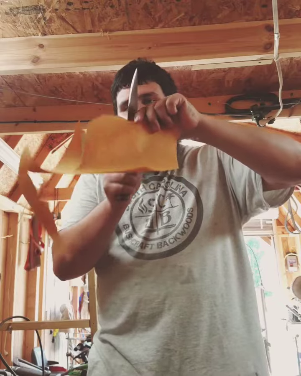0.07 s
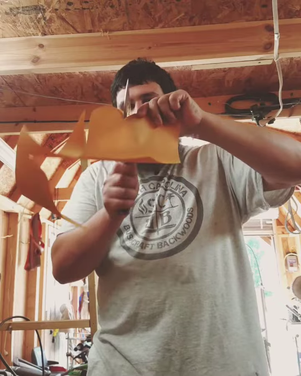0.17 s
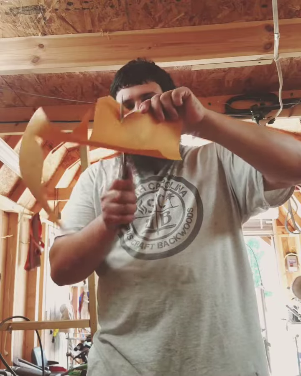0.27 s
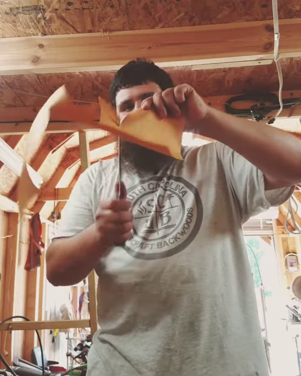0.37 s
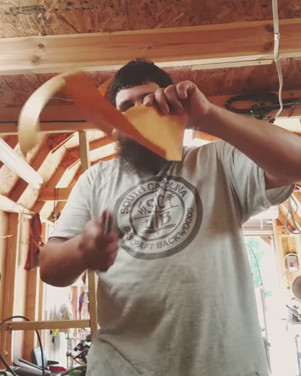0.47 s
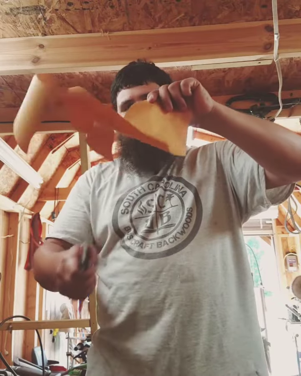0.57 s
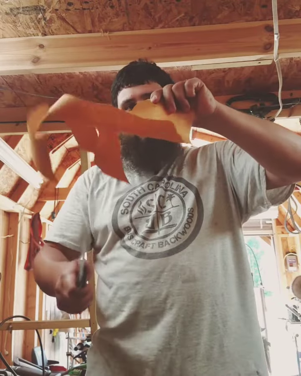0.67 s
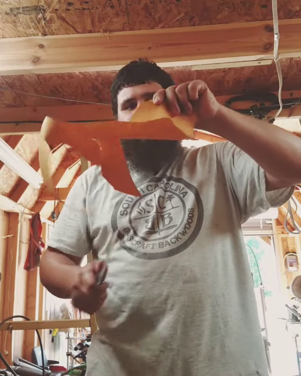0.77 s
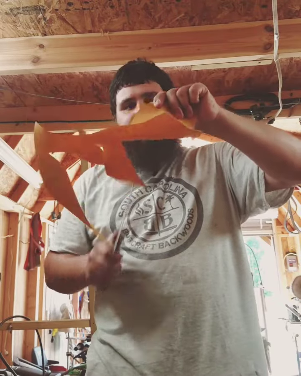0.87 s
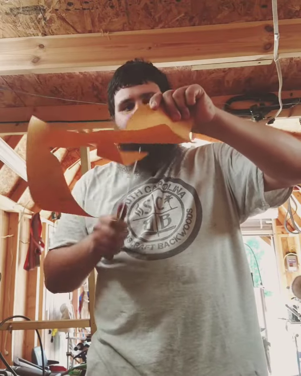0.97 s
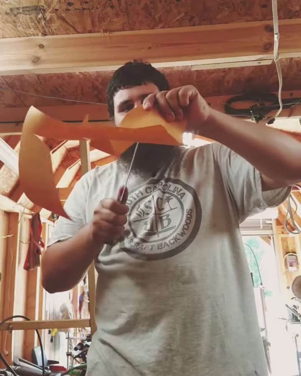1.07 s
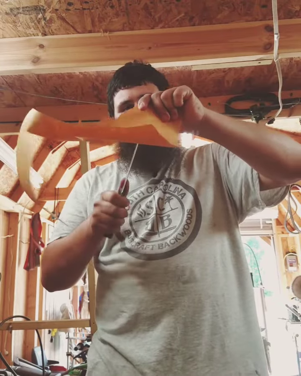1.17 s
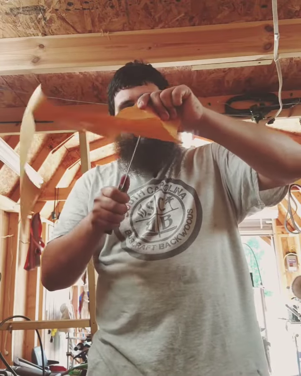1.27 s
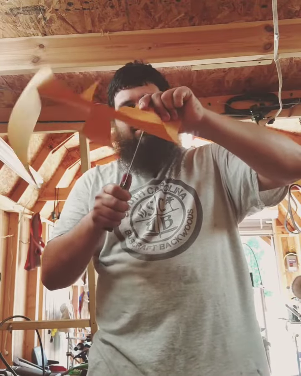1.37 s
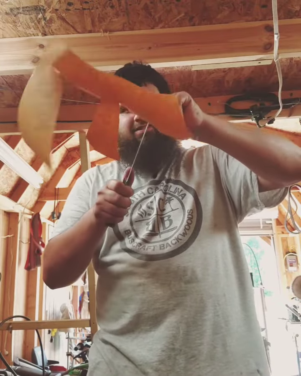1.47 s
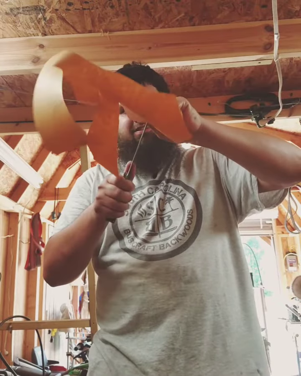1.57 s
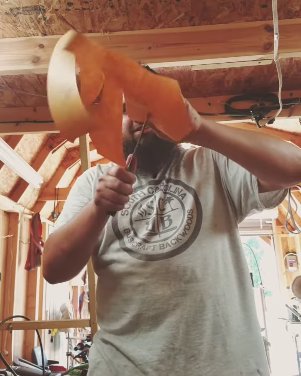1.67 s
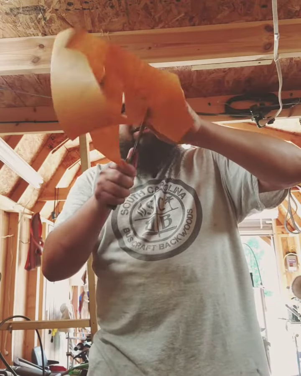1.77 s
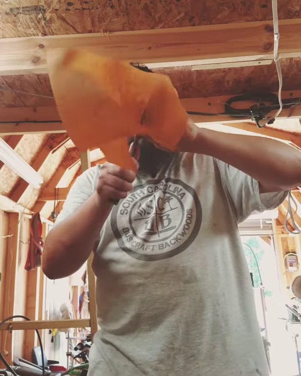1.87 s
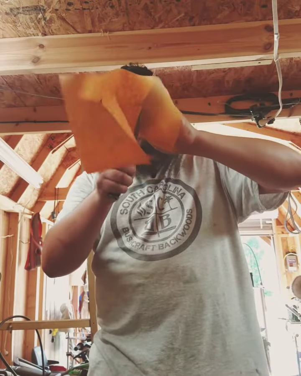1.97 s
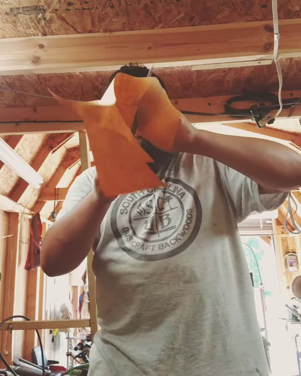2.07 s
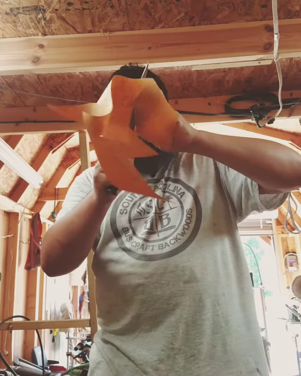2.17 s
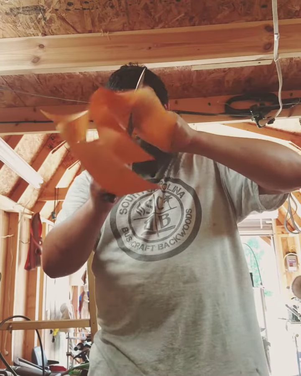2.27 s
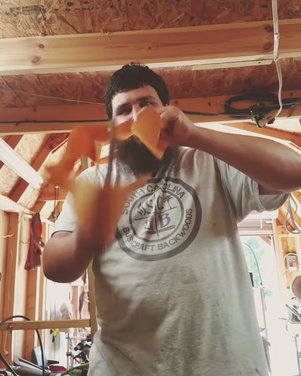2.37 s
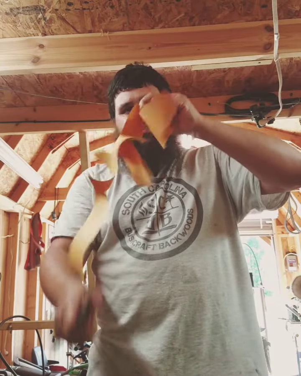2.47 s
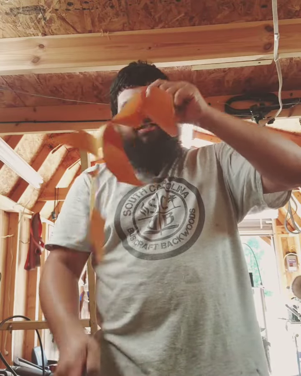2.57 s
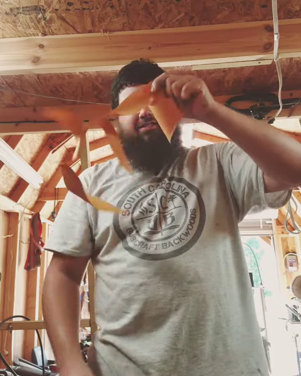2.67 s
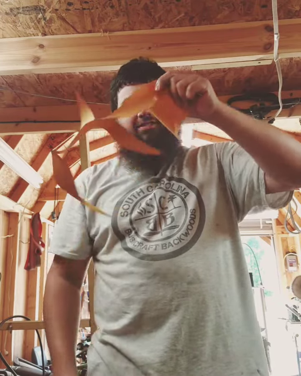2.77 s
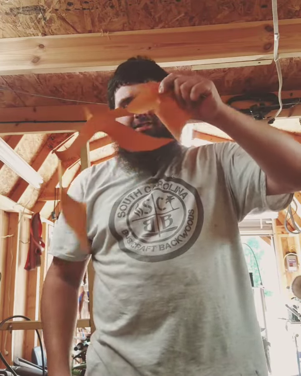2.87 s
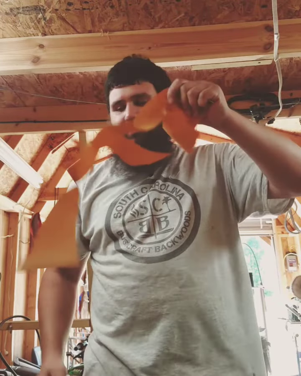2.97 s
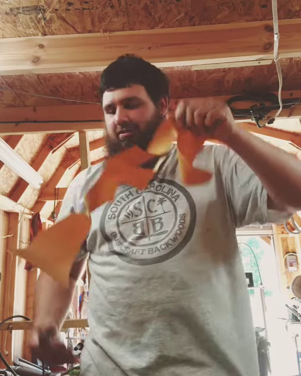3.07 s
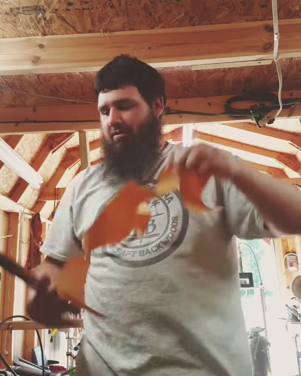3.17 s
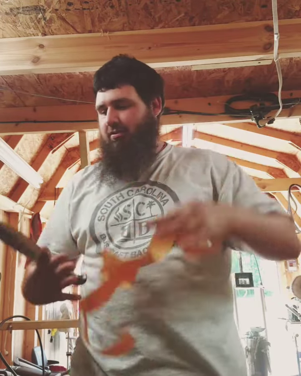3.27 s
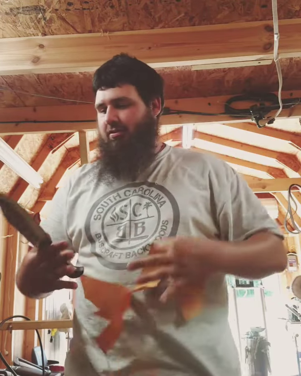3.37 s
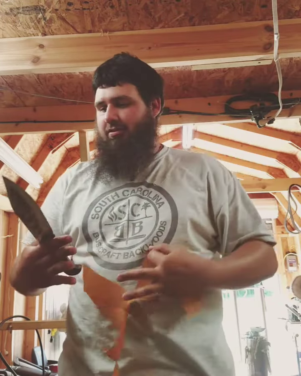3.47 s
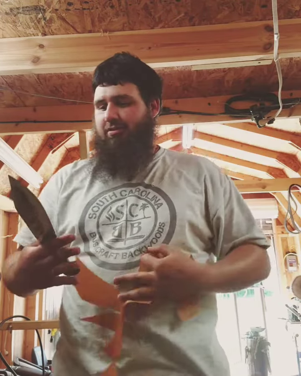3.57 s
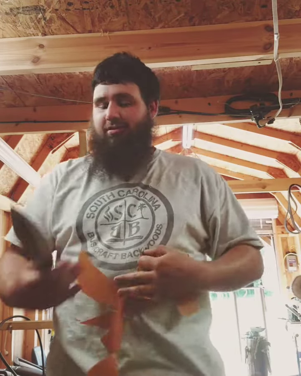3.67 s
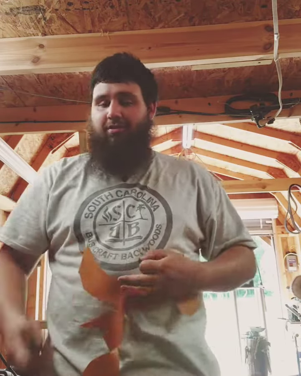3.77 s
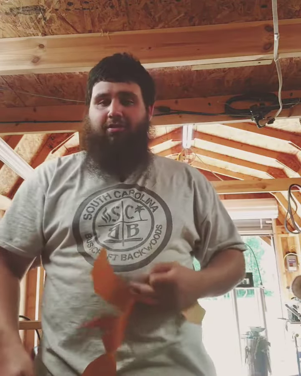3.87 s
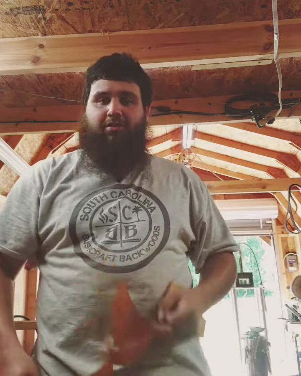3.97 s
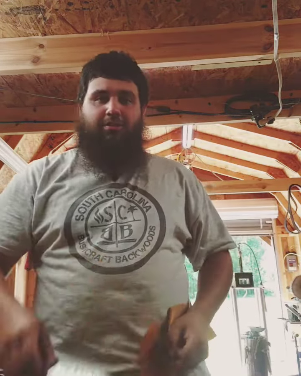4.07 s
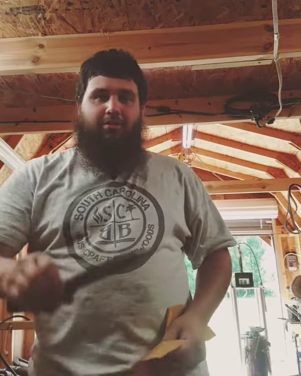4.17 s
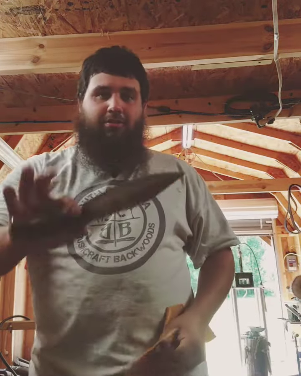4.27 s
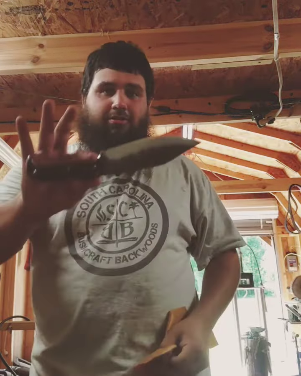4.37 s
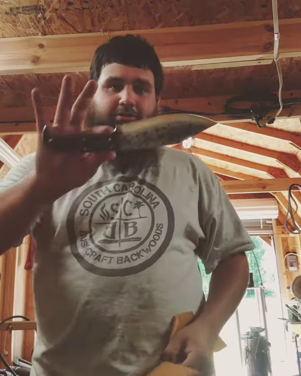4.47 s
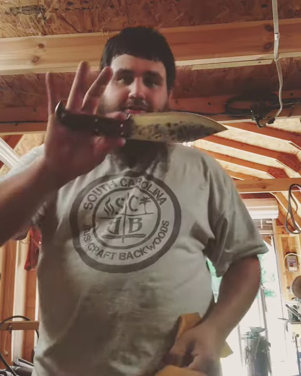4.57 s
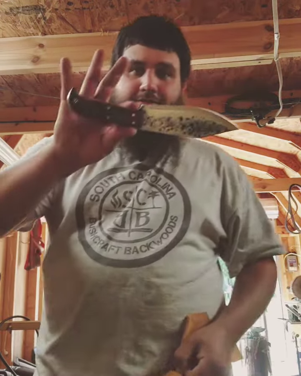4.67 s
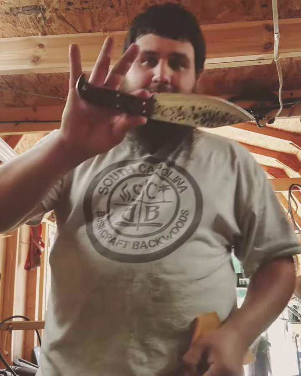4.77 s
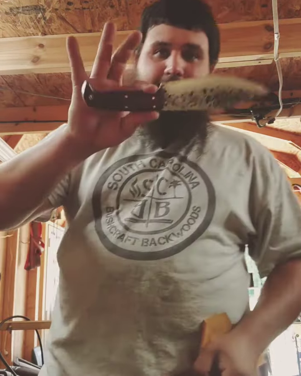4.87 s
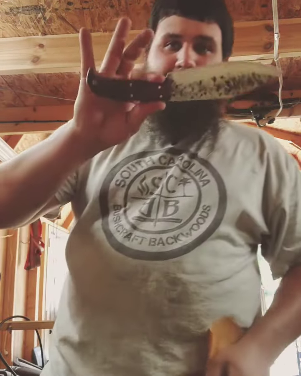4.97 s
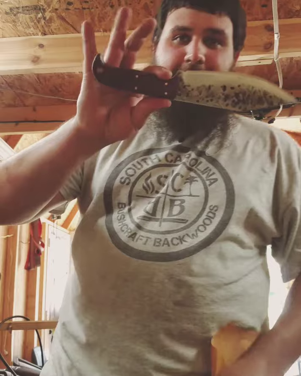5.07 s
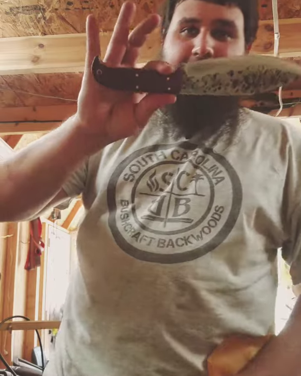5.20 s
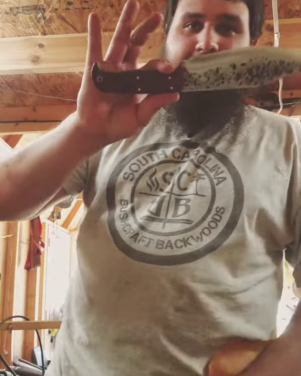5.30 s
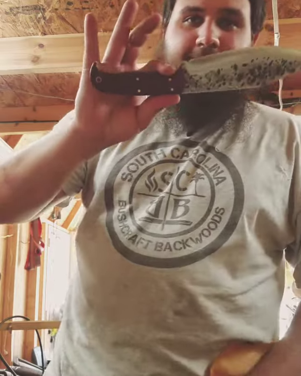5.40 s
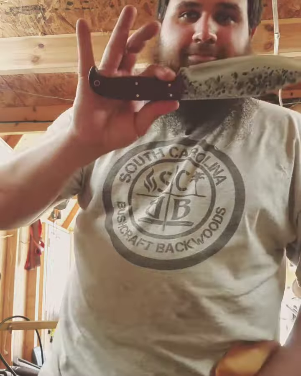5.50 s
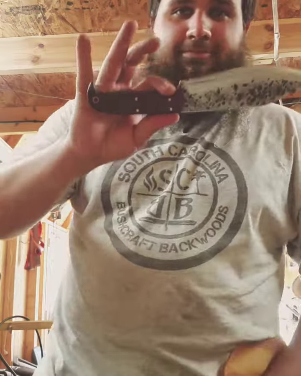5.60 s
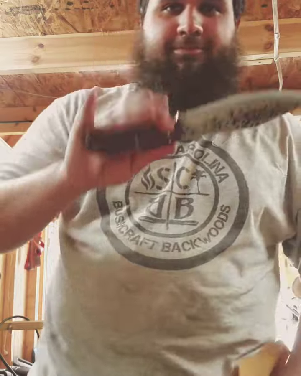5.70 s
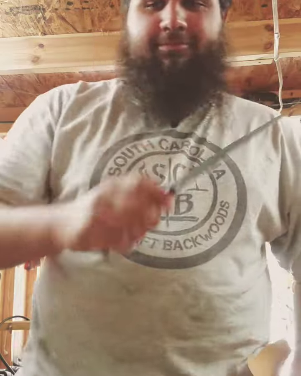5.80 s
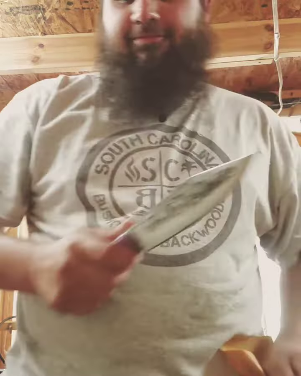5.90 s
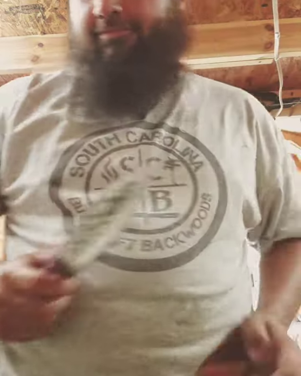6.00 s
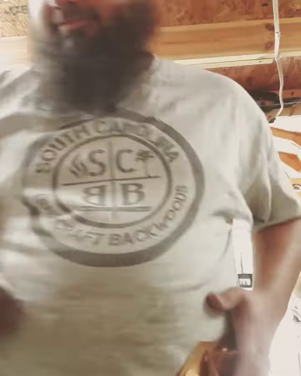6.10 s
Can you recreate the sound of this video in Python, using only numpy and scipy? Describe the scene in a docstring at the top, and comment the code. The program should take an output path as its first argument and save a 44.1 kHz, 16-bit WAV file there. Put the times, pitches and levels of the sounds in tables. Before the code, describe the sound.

Quick papery rips from a keen blade, small crinkly pops and soft rubbing afterwards, with a fan and motors humming low in a wooden room.

```python
"""A sharp knife slices a hand-held sheet of paper in a small wooden workshop, heard at two microphone ports.
The edge snaps fibres by the thousand, as filtered random impulses, and the sheet radiates them.
Loose paper buckles with cracks and brief rings; paper and shirt rustle as sparser snaps in soft hiss.
A few soft steps boom as decaying sines. A fan and other motors hum throughout: wavering sines and coloured noise."""
import sys
import numpy as np
from scipy import signal
from scipy.fft import rfft, irfft
from scipy.io import wavfile

SR = 44100
rng = np.random.default_rng(int(sys.argv[2]) if len(sys.argv) > 2 else 0)


def wrap_up_sound(samples):
    """Save the sound to the file named by the first command line argument, as 16-bit audio."""
    columns = np.atleast_2d(samples).T
    # keep every value between -1 and 1, then stretch to whole-number steps
    tamed = np.clip(columns, -1, 1)
    steps = np.round(tamed * 32767).astype(np.int16)
    wavfile.write(sys.argv[1], SR, steps)


N = 275184
T = np.arange(N) / SR

# sheet resonance colour: (frequency [Hz], relative level [dB])
SHEET_COLOUR = [(300, -35), (700, -19.5), (1100, -9.5), (1450, -13), (1850, 2.5), (2250, 2), (2700, 0.5),
                (3200, -3.5), (4200, -3), (6000, -24.5)]
# fibre sizzle colour: (frequency [Hz], relative level [dB])
SIZZLE_COLOUR = [(4000, -49), (7000, 0.5), (8300, 8), (9600, -3.5), (11500, 0.5), (13000, -4.5),
                 (14500, -13), (18000, -6)]


def undb(db):
    """Decibels to gain."""
    return np.exp(np.asarray(db) * (np.log(10) / 20))


def unit(x):
    """Scale to rms 1."""
    return x / np.sqrt(np.mean(x ** 2))


def colour(x, points):
    """Causal minimum-phase filter through (Hz, dB) points, built from the folded cepstrum."""
    points_hz, points_db = np.transpose(points)
    n = 4096
    bins_hz = np.maximum(np.fft.rfftfreq(n, 1 / SR), 1)
    bins_db = np.interp(np.log(bins_hz), np.log(points_hz), points_db)
    cepstrum = irfft(np.log(undb(bins_db)), n)
    cepstrum[1:n // 2] *= 2
    cepstrum[n // 2 + 1:] = 0
    response = irfft(np.exp(rfft(cepstrum)), n)
    return np.apply_along_axis(signal.oaconvolve, -1, x, response)[..., :x.shape[-1]]


def walk(rate_hz):
    """Smooth chance with a spread near 1, heading for a new value rate_hz times a second."""
    values = rng.standard_normal(8192)
    return 1.2 * np.interp(T * rate_hz, np.arange(len(values)), values)


def add(track, start_s, sound):
    """Mix a short sound into a track."""
    start = int(start_s * SR)
    track[start:start + len(sound)] += sound[:N - start]


def lean(pair, balance):
    """Tilt left against right, band by band, half the difference on each port."""
    return np.array([colour(x, np.array(balance) * [1, half]) for x, half in zip(pair, (.5, -.5))])


def hum(waver_db=0.1963, waver_rad=0.11):
    """Steady motor tones, the higher ones wavering more in the moving air; one more swells and fades slowly."""
    # motor and mains tones, with left's lead in the room's standing wave:
    # (frequency [Hz], left level [dB], right level [dB], left lead [rad])
    tones = [(57.8, -26, -22, 3.1), (78.6, -58, -54, 2.7), (96.6, -47, -51, 2.1), (115.6, -49, -51, .4),
             (119.9, -51, -51, 2.1), (173.4, -51.5, -47.5, 0), (231.1, -55, -55, -1.5),
             (245.3, -39, -35, 3.1), (265.8, -49, -50, 0), (317.2, -53, -50, 3.1), (346.7, -54, -48, .6),
             (359.8, -54, -55, 0), (462.3, -54, -53, 0), (520.1, -55, -53, 0), (642, -54, -50, .7),
             (659.8, -55, -59, .5), (875.4, -54, -52, .1), (1098, -59, -57, 3.1)]
    # slowly swelling motor tone: (frequency [Hz], middle [s], half length [s], level [dB])
    swelling_tone = (467, 3.5, 2.3, -51)
    out = np.zeros((2, N))
    for hz, left_db, right_db, lead_rad in tones:
        unrest = hz / tones[0][0]
        phase = 2 * np.pi * (hz * T + rng.random()) + waver_rad * unrest * walk(rate_hz=5.5)
        size = np.sqrt(2) * undb(waver_db * unrest * walk(rate_hz=6))
        left = undb(left_db) * np.sin(phase + lead_rad)
        right = undb(right_db) * np.sin(phase)
        out += size * np.array([left, right])
    hz, middle_s, half_s, db = swelling_tone
    swell = np.exp(-((T - middle_s) / half_s) ** 2)
    return out + np.sqrt(2) * undb(db) * swell * np.sin(2 * np.pi * hz * T + walk(rate_hz=9))


def air(mid_db=-36.5, side_db=-39, flutter_db=1.0):
    """The fan's soft rush: fluttering noise, one part common to both ports and one opposed between them."""
    # common part's colour: (frequency [Hz], relative density [dB per Hz])
    mid_colour = [(25, -7), (70, -4.5), (150, -4), (200, -2), (270, 3.5), (400, 1.5), (720, 1.5),
                  (1000, -6), (1400, -10), (2300, -9), (3500, -16), (5800, -14), (7500, -22.5),
                  (11000, -45.5)]
    # opposed part's colour: (frequency [Hz], relative density [dB per Hz])
    side_colour = [(25, -21), (60, -4), (150, 5), (270, -6), (450, -3), (800, -4), (1200, -1.5),
                   (2300, -7.5), (3500, -13), (5200, -9.5), (7500, -19), (11000, -17.5), (14500, -28)]
    mid = unit(colour(rng.standard_normal(N), mid_colour)) * undb(flutter_db * walk(rate_hz=7.4))
    side = unit(colour(rng.standard_normal(N), side_colour)) * undb(flutter_db * walk(rate_hz=7.4))
    return undb(mid_db) * mid + undb(side_db) * side * np.array([[1], [-1]])


def snaps(per_s, spread_db):
    """Fibres letting go at random moments: many small, a few large."""
    happens = rng.random(N) < per_s / SR
    size = undb(spread_db * np.clip(rng.standard_normal(N), -2.5, 2.5))
    return unit(happens * size * rng.choice([-1, 1], N))


def voice(fibres, friction_db, spectrum):
    """Fibre snaps, each pushing or pulling the sheet, and smooth friction, radiated with one colour."""
    pushes = unit(fibres) * rng.choice([-1, 1], N)
    friction = undb(friction_db) * rng.standard_normal(N)
    return unit(colour(pushes + friction, spectrum))


def force(start_s, rise_s, hold_s, release_s, contact_s=0.0096):
    """One push: the edge bites, the force builds, holds and dies faster and faster as it leaves the sheet."""
    bite_db, release_db = -9.5, -20.5  # re full force, at the first bite and after release_s
    t = T - start_s
    build = bite_db * np.clip(1 - t / rise_s, 0, 1)
    fall = release_db * np.clip((t - rise_s - hold_s) / release_s, 0, 10) ** 1.08
    return np.clip(t / contact_s + .5, 0, 1) * undb(build + fall)


def ring(x, hz, width_hz):
    """A resonance whose centre moves: shift down to zero, low-pass, shift back."""
    turn = np.exp(2j * np.pi * np.cumsum(hz) / SR)
    lowpass = signal.butter(2, width_hz / 2, fs=SR, output="sos")
    return unit((turn * signal.sosfilt(lowpass, x / turn)).real)


def flex(x, depth_db, rate_hz, count=11):
    """The paper bends as it moves, so its resonances flare and fade each on their own."""
    centres = np.log(np.geomspace(1200, 12000, count))
    pitch = np.log(np.maximum(np.fft.rfftfreq(N, 1 / SR), 1))
    spectrum = rfft(x)
    bands = (irfft(spectrum * np.interp(pitch, centres, share), N) for share in np.eye(count))
    return sum(band * unit(undb(depth_db * walk(rate_hz))) for band in bands)


def slicing(strip_width_hz=950, strip_wander=0.043, scrape_db=1, sheet_db=2.5, sizzle_db=6.0, catch_db=1.5):
    """The edge catches and slips, so the fibre snaps come in bunches; the strip's ring glides as it is freed."""
    # blade pushes: (start [s], rise [s], hold [s], release [s], relative scrape level [dB],
    # then re scrape: sheet resonance [dB], sizzle [dB], low body [dB], strip ring [dB],
    # ring frequency at start [Hz], ring frequency at end [Hz])
    pushes = [(0.151, 0.004, 0.47, 0.056, -34, 1, -3, -9.5, 3, 3070, 3660),
              (0.208, 0.048, 0.02, 0.27, -22.5, -0.5, -22, -15, -5.5, 5970, 4640),
              (0.282, 0.014, 0.051, 0.036, -36, 3, -16, -12, 11.5, 2130, 2960),
              (0.425, 0.014, 0.031, 0.028, -39.5, -6, -12, -14, 10.5, 2230, 2940),
              (0.514, 0.038, 0.057, 0.016, -24, -10, -3, -10.5, -8, 4230, 5140),
              (1.598, 0.012, 0.11, 0.12, -22, -6.5, -6, -10.5, -1.5, 5100, 4840),
              (1.833, 0.12, 0.024, 0.21, -24, -6.5, -6, -9.5, -9, 4940, 5670),
              (1.92, 0.062, 0.14, 0.075, -37.5, -0.5, -3, -8, 6, 2330, 2000),
              (2.408, 0.12, 0.015, 0.08, -27.5, -4, -6.5, -4.5, -7, 5900, 5450),
              (2.491, 0.031, 0.0071, 0.033, -20.5, -14, -2.5, -22, -4, 5500, 5700),
              (2.609, 0.0079, 0.036, 0.038, -23.5, -18, -2, -23, -3.5, 3450, 6000)]
    # blade scrape colour: (frequency [Hz], relative level [dB])
    scrape_colour = [(400, -43), (1500, -17), (2600, -17), (3300, -8), (4100, -3.5), (4800, -3.5),
                     (5800, 0.5), (6600, -4), (7600, -12), (9500, -11), (15000, -46)]
    # sheet's low body colour: (frequency [Hz], relative level [dB])
    body_colour = [(150, -17.5), (350, -4), (600, 2.5), (1000, -2), (1500, -1.5), (2500, 0), (6000, -59)]
    fibres = snaps(per_s=7000, spread_db=3.5) * undb(catch_db * walk(rate_hz=280))
    wander = 1 + strip_wander * walk(rate_hz=45)
    power, strip = np.zeros((4, N)), np.zeros(N)
    for start_s, rise_s, hold_s, release_s, db, *shares_db, strip_db, first_hz, last_hz in pushes:
        push = force(start_s, rise_s, hold_s, release_s)
        gains = undb(db + np.array([0, *shares_db]))[:, None]
        # sheet and sizzle follow slightly different powers of the force
        power += (gains * [push, push ** 0.99, push ** 1.06, push]) ** 2
        end_s = start_s + rise_s + hold_s + release_s / 2
        glide_hz = np.interp(T, [start_s, end_s], [first_hz, last_hz])
        strip += undb(db + strip_db) * push * ring(fibres, glide_hz * wander, strip_width_hz)
    scrape = undb(scrape_db) * voice(fibres, -8, scrape_colour)
    sheet = undb(sheet_db) * voice(fibres, -8, SHEET_COLOUR)
    sizzle = undb(sizzle_db) * voice(fibres, -8, SIZZLE_COLOUR)
    body = voice(fibres, -8, body_colour)
    cuts = np.sum(np.sqrt(power) * [scrape, sheet, sizzle, body], axis=0)
    return flex(cuts + strip, depth_db=3, rate_hz=80)


def buckles(ring_cycles=5, crack_s=.0005, settle_s=.014, settle_db=-21, ring_width=.19):
    """A fold pops through: a sharp crack, a brief ring of the patch, and small snaps as it settles."""
    # folds: (time [s], relative peak [dB], ring frequency [Hz], crack level re ring [dB])
    folds = [(0.2614, -7, 1930, 10), (1.0554, -13, 5600, -2), (1.1035, -13.5, 4900, -12),
             (1.108, -11, 5800, 3.5), (1.3974, -8, 4230, -8), (1.4, -21, 5470, -1), (1.411, -8, 5500, 6),
             (1.4934, -24, 4700, -5), (1.4973, -8.5, 4660, 4), (1.503, -7, 6040, 20),
             (1.5652, -13, 4860, -1), (1.5834, -8, 4800, -15), (1.603, -6, 5300, 3), (2.0773, -7, 2070, -3),
             (2.095, -7, 2230, 0), (2.195, -20, 4950, -5), (2.4074, -8.5, 1840, -3),
             (2.586, -3.5, 2810, -6), (2.5978, -10, 2370, 2), (2.6188, -4.5, 3770, -19),
             (3.1406, -21.5, 11500, 4), (3.6653, -19.5, 5830, -7.5), (3.934, -6, 6300, 6.5),
             (4.1541, -28.5, 5790, 1), (4.4677, -17.5, 5200, -10), (5.437, -16.5, 5600, -5),
             (5.521, -8.5, 5700, -12), (5.5578, -8, 5600, 3), (5.597, -7, 5500, 0), (5.6214, -4, 5560, -7),
             (5.6225, -14, 5500, -8), (5.643, -2.5, 5370, -2), (5.7077, -6, 5400, -14),
             (5.7618, -12, 5260, -10.5), (5.8315, -11, 5800, -4), (5.844, -6, 4600, -9),
             (6.048, -17, 5900, -7), (6.1368, -12, 5770, -4)]
    # crack colour: (frequency [Hz], relative level [dB])
    crack_colour = [(300, -1), (1200, -17), (2300, -8), (3400, -5), (5500, -1.5), (7500, 1), (10500, -6.5),
                    (15000, -14)]
    out, t = np.zeros(N), T[:2048]
    for fold_s, db, hz, crack_db in folds:
        noise = rng.standard_normal((2, len(t)))
        partials_hz = hz * np.exp(ring_width * np.array([-1, 0, 1]))
        tones = np.array([.5, 1, .7]) @ np.sin(2 * np.pi * partials_hz[:, None] * t)
        patch = tones * np.exp(-t * hz / ring_cycles)
        burst = np.sign(noise[0]) * np.exp(-t / crack_s)
        settling = undb(settle_db) * noise[1] * np.exp(-t / settle_s)
        crack = colour(burst + settling, crack_colour)
        pop = unit(patch) + undb(crack_db) * unit(crack)
        add(out, fold_s + 0.00073, undb(db) * pop / abs(pop).max())
    return out


def handling(sizzle_db=6.0, rub_db=1.0, sheet_db=-6.0, flutter_db=-0.7, snap_spread_db=2.5):
    """Light rubbing: sparser snaps in a soft hiss that swells and dies with each slide."""
    # slides of paper and cloth: (middle [s], half length [s], relative sizzle level [dB],
    # rub level re sizzle [dB], sheet resonance level re sizzle [dB])
    slides = [(1.232, 0.035, -45.5, 1, 5), (1.51, 0.012, -36, -2, 8), (1.585, 0.032, -35, 5, 6),
              (2.136, 0.0083, -46, 11, 5), (2.207, 0.015, -43.5, 7, 11.5), (2.304, 0.015, -51, 5, 19),
              (2.328, 0.031, -45, 5, 10.5), (2.41, 0.012, -43.5, 10.5, 10), (2.452, 0.018, -46, 7, 16),
              (3.238, 0.088, -52, 4, 11), (3.415, 0.019, -53.5, -2.5, 0), (3.704, 0.081, -51.5, 3.5, 10.5),
              (4.004, 0.11, -44, 1, 3), (4.25, 0.079, -47.5, 5.5, 4.5), (5.14, 0.072, -47.5, 4, 2),
              (5.452, 0.14, -44.5, 6.5, 1), (5.537, 0.027, -35.5, 8, -1), (5.607, 0.015, -29.5, 1.5, -1),
              (5.66, 0.024, -36, 9, 8), (5.711, 0.013, -40, 12.5, -2), (5.784, 0.049, -46.5, 10.5, -1),
              (5.863, 0.058, -43, 9.5, 0), (5.962, 0.12, -41, 7.5, 8.5), (6.08, 0.04, -43, 11, 16),
              (6.144, 0.054, -43.5, 6.5, 6), (6.232, 0.015, -34, 10, 11.5)]
    # light rubbing colour: (frequency [Hz], relative level [dB])
    rub_colour = [(200, -24), (700, -13.5), (1300, -7), (2600, -6), (3700, -8.5), (4500, 3), (5100, -1),
                  (5800, 2), (6500, -3), (7600, -13), (9500, -19), (15000, -28)]
    flutter = undb(2.2 * walk(rate_hz=110) + flutter_db * walk(rate_hz=40))
    fibres = snaps(per_s=900, spread_db=snap_spread_db) * flutter
    sizzle = undb(sizzle_db) * voice(fibres, 1, SIZZLE_COLOUR)
    rub = undb(rub_db) * voice(fibres, -5, rub_colour)
    sheet = undb(sheet_db) * voice(fibres, 3, SHEET_COLOUR)
    power = np.zeros((3, N))
    for middle_s, half_s, db, rub_share_db, sheet_share_db in slides:
        swell = np.exp(-np.minimum(abs((T - middle_s) / half_s), 10) ** 1.66)  # exponent 2 = bell curve
        power += np.outer(undb(db + np.array([0, rub_share_db, sheet_share_db])) ** 2, swell)
    rustle = np.sum(np.sqrt(power) * [sizzle, rub, sheet], axis=0)
    return flex(rustle, depth_db=3.5, rate_hz=55)


def steps(swell_s=0.024):
    """A soft footfall makes the floor boom briefly at two close frequencies."""
    # footfalls: (time [s], relative level [dB], boom frequency [Hz])
    footfalls = [(4.729, -35, 130), (5.484, -32, 145), (5.955, -34, 135), (6.0, -37, 173.4)]
    out, t = np.zeros(N), T[:SR // 3]
    swell = (t / swell_s) ** 2 * np.exp(2 - 2 * t / swell_s)
    for step_s, db, hz in footfalls:
        boom = np.sin(2 * np.pi * hz * t) + 0.5 * np.sin(2 * np.pi * hz * 0.83 * t)
        add(out, step_s, undb(db) * boom * swell)
    return out


def ports(x, delay_samples):
    """Direct sound reaches the left port delay_samples after the right one."""
    return np.array([np.pad(x, (delay_samples, 0))[:N], x])


def reflections(x, t60_s=0.24, tail_db=-8, early_db=-1.5, early_s=0.0045):
    """What one port hears back: chest and rafters first, then a short wooden tail."""
    t = T[:SR // 2]
    hits = (rng.random(len(t)) < .15) * rng.standard_normal(len(t))
    early = hits * np.exp(-t / early_s) * (t > .001)
    tail = rng.standard_normal(len(t)) * undb(-60 * t / t60_s) * np.minimum(t / .008, 1)
    early = undb(early_db) * early / np.linalg.norm(early)
    tail = undb(tail_db) * tail / np.linalg.norm(tail)
    return signal.oaconvolve(x, early + tail)[:N]


def workshop(x, count=3):
    """The sheet flaps about, so its sound passes between a few sets of reflections."""
    shares = np.array([undb(9 * walk(rate_hz=12)) for _ in range(count)])
    shares /= np.linalg.norm(shares, axis=0)
    return sum(np.array([reflections(x * share), reflections(x * share)]) for share in shares)


def scene(room_db=3.5):
    """Paper in the room, steps and machines; the leaned sounds are fuller at right in the bass."""
    # port balance for sound from the front: (frequency [Hz], left minus right [dB])
    front_balance = [(150, -12.5), (600, -1), (1500, 2.5), (3200, -1.9), (5000, -2), (8000, 2.5),
                     (11000, -2.5), (14000, -11)]
    # left-right balance of the soft rush: (frequency [Hz], left minus right [dB])
    rush_balance = [(150, -3), (600, -1), (1500, 0.7), (5000, -2), (8000, 6.5), (11000, -6.5), (14000, -13)]
    # colour of the wooden walls' and rafters' reflections: (frequency [Hz], relative level [dB])
    wood_colour = [(500, -1.5), (1300, -2), (2200, -3), (3200, -1), (4500, -1.5), (8000, 1), (13000, -0.5)]
    # two patches of the sheet, each with its own snaps, lead at opposite ports; both rustle layers reach the
    # right port first
    patch_a, patch_b = undb(-4) * slicing(), undb(-6.5) * slicing()
    rustle_a, rustle_b = undb(-4.5) * handling(), undb(-6) * handling()
    pops = buckles()
    direct = ports(patch_a, 18) + ports(patch_b, 22)[::-1]
    direct += ports(rustle_a, 8) + ports(rustle_b, 17) + ports(pops, 16)
    room = workshop(patch_a + patch_b + rustle_a + rustle_b + undb(-7) * pops, count=5)
    front = direct + undb(room_db) * colour(room, wood_colour) + steps()
    return lean(front, front_balance) + lean(air(), rush_balance) + hum()


def record(dry):
    """The ports notch the treble, the loudest peaks are rounded and the top is cut."""
    # narrow band cancelled by the microphone ports: (frequency [Hz], level [dB])
    port_notch = [(6300, 0.5), (7100, -6), (7700, -17.5), (8300, -22.5), (8900, -11), (9600, -1.5)]
    top_hz = 14450
    rounded = .8 * np.tanh(colour(dry, port_notch) / .8)
    return signal.sosfilt(signal.ellip(10, .2, 80, top_hz, fs=SR, output="sos"), rounded)


dry = scene()
out = record(dry)
wrap_up_sound(out)
```